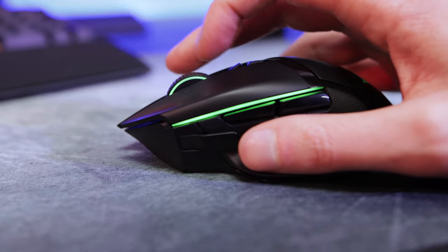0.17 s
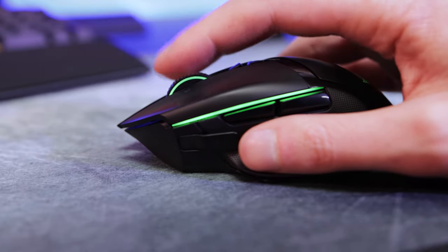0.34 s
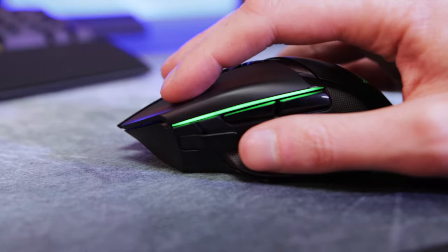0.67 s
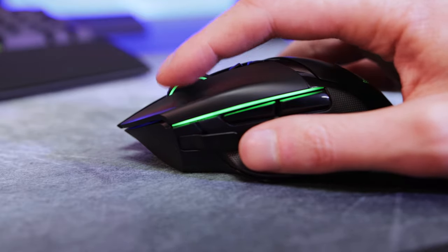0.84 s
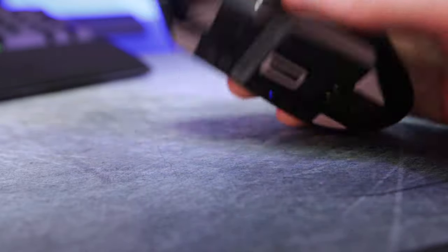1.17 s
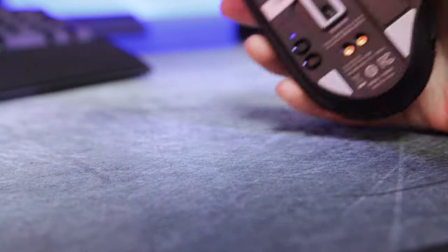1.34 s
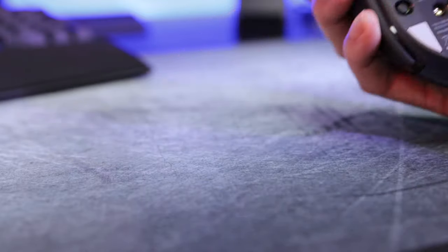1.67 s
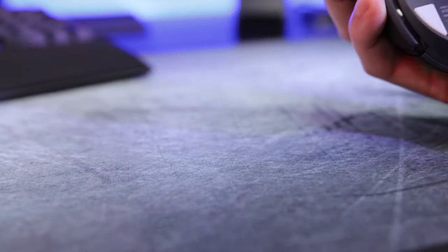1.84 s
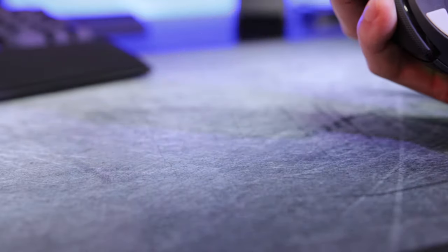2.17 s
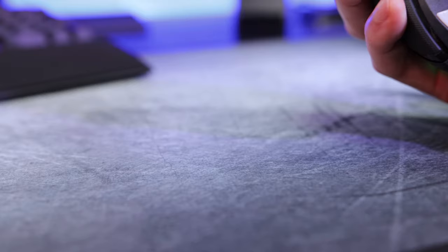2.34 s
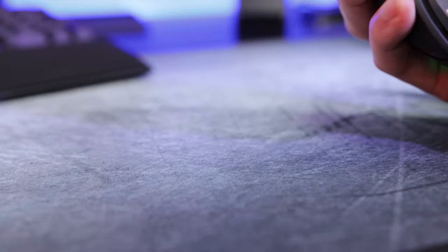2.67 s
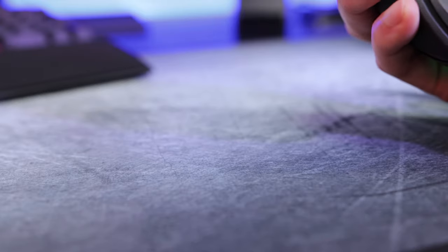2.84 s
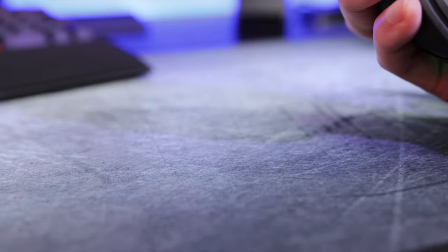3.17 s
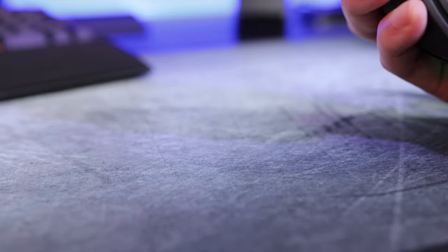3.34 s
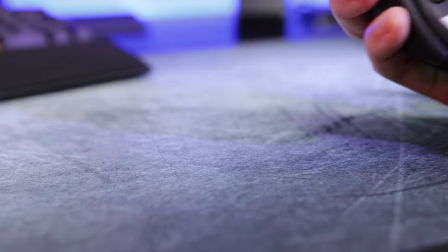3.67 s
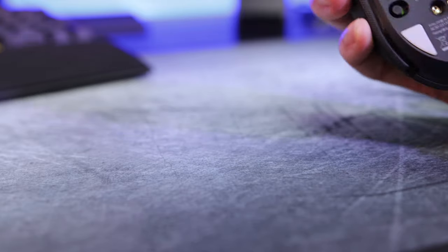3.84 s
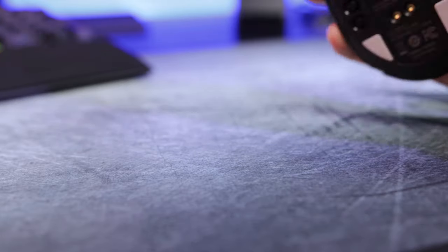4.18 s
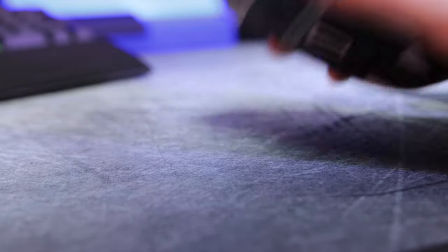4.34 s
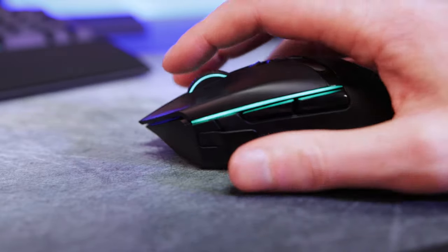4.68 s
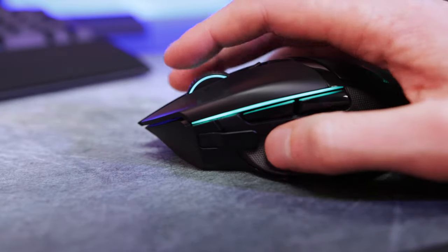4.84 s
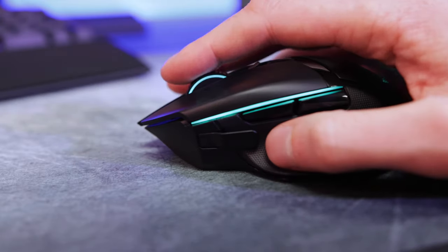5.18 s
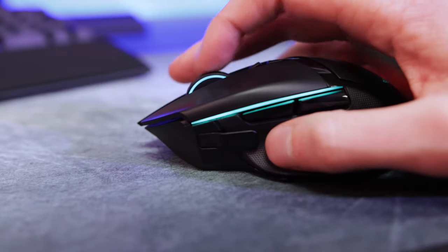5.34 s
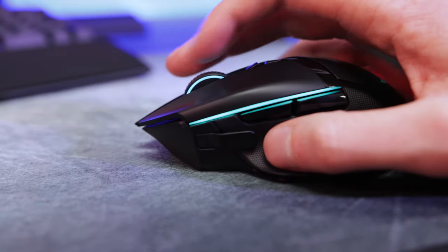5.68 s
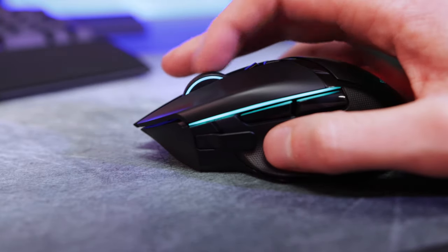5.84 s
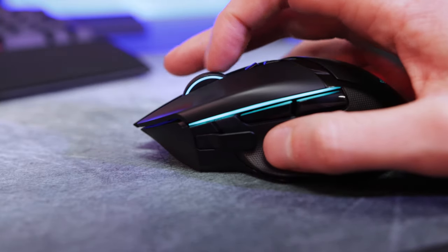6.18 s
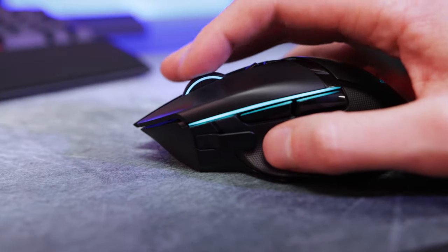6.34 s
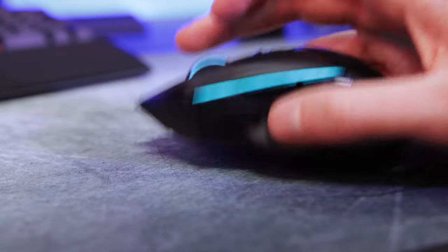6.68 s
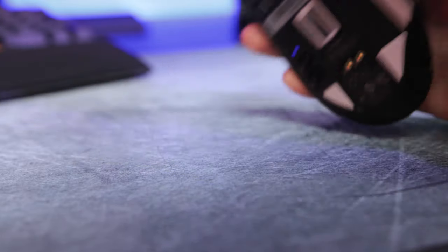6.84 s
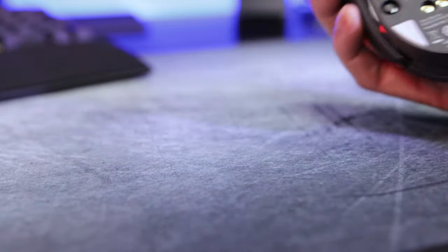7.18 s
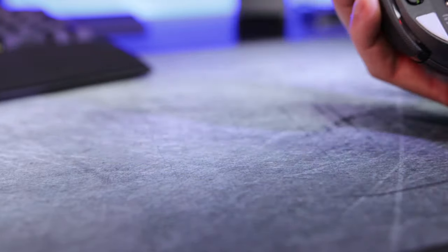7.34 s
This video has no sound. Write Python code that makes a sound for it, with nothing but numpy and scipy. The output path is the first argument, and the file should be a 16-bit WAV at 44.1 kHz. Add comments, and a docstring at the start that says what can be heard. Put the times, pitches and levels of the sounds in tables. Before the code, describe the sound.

Computer fans hum softly in a small room. Close to the microphone, a mouse button clicks twice, sharply. The mouse is lifted off its cloth mat with a rustle, and fingers rub and knock on the hollow plastic shell between scattered clicks. It lands on the desk with two loud clacks, each with a low thud and brief rattle. After a pause it is lifted again with more rubbing, a few taps and a last click.

```python
"""Computer fans hum softly, then a mouse clicks, close to the microphone in a small room.
Each switch chatters for about 2 ms and excites the damped modes of its plastic button. The mouse is
lifted off a cloth mat and handled: fingers knock on the hollow shell and rub it, brighter as they slide
faster. It lands on the desk in two steps, each a blow, a fading rattle and a brief rocking, and is
then lifted and clicked again."""
import sys
import numpy as np
from scipy import signal
from scipy.fft import rfft, irfft, next_fast_len
from scipy.io import wavfile
from scipy.ndimage import uniform_filter1d

SR = 44100
rng = np.random.default_rng(int(sys.argv[2]) if len(sys.argv) > 2 else 0)


def to_wav(sig):
    """Store sig (one row per channel, or 1-D mono) as 16-bit WAV at the path in sys.argv[1].

    Samples outside -1..1 are clipped; the rate is SR.
    """
    pcm = np.clip(np.atleast_2d(sig), -1, 1) * 32767
    pcm = np.round(pcm).astype(np.int16)
    wavfile.write(sys.argv[1], SR, pcm.T)  # frames by channels


N = 331191
TIME = np.arange(N) / SR
BAND_LIMIT_HZ = 16550


def amp(db):
    """Amplitude ratio of a level in decibels."""
    return 10 ** (np.asarray(db) / 20)


def unit_rms(x):
    """Normalisation to unit mean power."""
    return x / np.sqrt(np.mean(x ** 2) + 1e-30)


def curve_at(points, hz):
    """Linear interpolation on a log-frequency axis."""
    f, value = np.transpose(points)
    return np.interp(np.log(hz + 1), np.log(f + 1), value)


def add(mix, s, sound):
    """Superposition: a sound joins the mix at time s."""
    part = mix[round(s * SR):][:len(sound)]
    part += sound[:len(part)]


def hiss(spectrum):
    """Spectral shaping: white noise takes on a given power density."""
    size = next_fast_len(N)
    gain = amp(curve_at(spectrum, np.fft.rfftfreq(size, 1 / SR)))
    return irfft(rfft(rng.standard_normal(size)) * gain, size)[:N] * np.sqrt(SR / 2)


# reverberation time (frequency [Hz], T60 [s])
REVERB_T60 = [(100, 0.0037), (1000, 0.56), (3500, 0.2586), (8000, 0.45), (16000, 0.34)]
# reverberant against direct sound (frequency [Hz], level [dB])
REVERB_LEVEL = [(100, -2), (1000, -18), (2400, -13.5), (3250, -13), (3850, -6.5), (4800, -11.5),
                (7000, -16), (11000, -19), (16000, -24)]
def room(x, build_up_s=0.0078):
    """Diffuse reflections decay exponentially; the mouse moves, so each blow meets its own pattern."""
    t = np.arange(SR // 2) / SR
    reflections = rng.standard_normal(len(t)) * (1 - np.exp(-(t / build_up_s) ** 2))
    hz, when, bands = signal.stft(reflections, SR, nperseg=256)
    t60 = curve_at(REVERB_T60, hz)[:, None]
    gain = amp(curve_at(REVERB_LEVEL, hz))[:, None] * np.sqrt(2 * np.log(1000) / (t60 * SR))
    decay = np.exp(-np.log(1000) * when / t60)
    response = signal.istft(bands * gain * decay, SR, nperseg=256)[1]
    response[0] += 1  # the direct path
    return signal.fftconvolve(x, response)


# rush of air (frequency [Hz], density [dB/Hz])
AIR_SPECTRUM = [(20, -99), (50, -79), (150, -82), (210, -76), (300, -81.5), (500, -83), (750, -87.5),
                (1000, -86), (1180, -85.5), (1500, -91), (2100, -96), (2700, -103), (3400, -103),
                (3850, -100.5), (4300, -106), (4850, -114), (8000, -118), (15700, -119), (16100, -140)]
# fan and mains tones (centre frequency [Hz], typical rms level [dB], waver [Hz])
HUM_TONES = [(86.5, -57.5, 1.574), (120.4, -56, 1.937), (236.75, -61.5, 3.042)]
def fans():
    """Broadband flow noise lies under low tones that waver in pitch and level."""
    out = hiss(AIR_SPECTRUM)
    knots = np.linspace(0, N / SR, num=90)
    for hz, db, waver_hz in HUM_TONES:
        drift, swell = (np.interp(TIME, knots, rng.standard_normal(len(knots))) for _ in range(2))
        phase = 2 * np.pi * np.cumsum(hz + waver_hz * drift) / SR
        out += np.sqrt(2) * amp(db + 1.48 * waver_hz * swell) * np.sin(phase)
    return out


def swells(strokes):
    """Amplitude envelope of short strokes, each a Gaussian pulse."""
    return sum(amp(db) * np.exp(-((TIME - s) / width) ** 2 / 2) for s, width, db in strokes)


def move(points, fade_db_per_s=201.5):
    """Amplitude envelope of a longer move of the hand, with exponential tails at both ends."""
    s, db = np.transpose(points)
    outside_s = abs(TIME - np.clip(TIME, s[0], s[-1]))
    return amp(np.interp(TIME, s, db) - fade_db_per_s * outside_s)


# skin on plastic, before gain and tilt (frequency [Hz], density [dB/Hz])
SKIN_SPECTRUM = [(300, -115), (1100, -93), (2200, -99), (3900, -91), (4900, -103), (6200, -102),
                 (7400, -99), (9500, -104), (13500, -105), (15500, -109)]
def slide(friction, tilt_db_per_octave, body_hz=2500, pivot_hz=8000, slowest_db=-14, brightening=0.35):
    """Sliding friction: faster motion makes the noise louder and tilts its treble upward."""
    hz, when, bands = signal.stft(hiss(SKIN_SPECTRUM), SR, nperseg=256)
    friction_db = np.maximum(20 * np.log10(np.interp(when, TIME, friction) + 1e-9), slowest_db)
    octaves = np.log2(np.maximum(hz, body_hz) / pivot_hz)[:, None]
    tilt = amp((tilt_db_per_octave + brightening * friction_db) * octaves)
    return friction * signal.istft(bands * tilt, SR, nperseg=256)[1][:N]


# friction as the hand lifts the mouse, turns it back over and lifts it again (time [s], level [dB])
LIFT_FRICTION = [(0.92, -23), (1.14, -12), (1.285, -0.18), (1.355, -6.5), (1.475, 6.5), (1.525, -6),
                 (1.575, 6), (1.68, -26)]
TURN_FRICTION = [(3.91, -23.5), (3.955, -2.9), (4.0, 7.5), (4.045, -2.02), (4.07, -2), (4.095, -3),
                 (4.155, 3.5), (4.2, -15.5)]
RELIFT_FRICTION = [(6.58, -17.5), (6.81, -8), (6.85, -1), (6.98, -3.5), (7.01, 4), (7.085, 7), (7.14, -6.5)]
# finger strokes; drags of mat or fingers on the shell (time [s], half length [s], level [dB])
FINGER_STROKES = [(.47, 0.029, -15), (1.853, 0.018, -12), (2.217, .044, -14.5), (2.511, 0.0165, -1.5),
                  (2.652, 0.022, -4), (3.0, 0.025, -17.5), (4.543, .021, -2.5), (4.672, 0.024, 2.5),
                  (7.217, 0.031, -2.5), (7.343, 0.0253, -2.5), (7.471, 0.045, -7)]
SHELL_DRAGS = [(1.26, 0.051, 2.5), (1.52, 0.071, -16), (2.51, 0.024, -2.5), (3.967, 0.048, -3.5),
               (6.87, 0.156, -3.5)]
# resonances of scuffed buttons and dragged shell, at unit gain (frequency [Hz], density [dB/Hz])
SCUFF_SPECTRUM = [(1000, -104), (2300, -94.5), (2700, -87.5), (3000, -95.5), (3470, -87.5), (3900, -95),
                  (4340, -97.5), (5200, -105), (6300, -106), (7050, -100), (8500, -111), (15500, -114)]
DRAG_SPECTRUM = [(500, -100), (900, -96.5), (1200, -81), (1500, -92), (2300, -95.5), (3100, -103),
                 (3850, -91), (4400, -104), (5000, -115)]
def rubbing(fidget_db=-15.5, wander_db=4.5, grain_db=2, catch_db=1.28):
    """Stick-slip friction: skin slips in fine grains, catches now and then, and excites the plastic."""
    knots = np.arange(0, N / SR, 0.07)
    wander = np.interp(TIME, knots, rng.standard_normal(N)[:len(knots)])
    # the fingers never quite rest while they hold the mouse up
    fidget = move([(2.195, fidget_db), (3.88, fidget_db)]) * amp(wander_db * wander)
    fingers = np.hypot(swells(FINGER_STROKES), fidget)
    skin = slide(move(LIFT_FRICTION) + move(RELIFT_FRICTION), tilt_db_per_octave=0.17)
    skin += slide(move(TURN_FRICTION), tilt_db_per_octave=2.5)
    skin += slide(fingers, tilt_db_per_octave=1.5)
    plastic = fingers * hiss(SCUFF_SPECTRUM) + swells(SHELL_DRAGS) * hiss(DRAG_SPECTRUM)
    grains = unit_rms(uniform_filter1d(rng.standard_normal(N), size=70))
    catches = unit_rms(uniform_filter1d(rng.standard_normal(N), size=700))
    return (skin + plastic) * amp(grain_db * grains + catch_db * catches)


def treble_share(hz):
    """High shelf: the share of the treble gain rises from 0 to 1 around 7.5 kHz."""
    return 1 / (1 + (7500 / (hz + 1)) ** 4)


def crack(spectrum, treble_db, contact_s, fade_s, tail_db, damping_hz=9000, size=4096):
    """Modal overlap: dense modes merge into a noise burst during contact, then a duller, dying tail."""
    t, hz = np.arange(size) / SR, np.fft.rfftfreq(size, 1 / SR)
    onset = 1 - np.exp(-(t / 0.000241) ** 2)
    contact = onset * np.exp(-(t / contact_s) ** 4)
    decay = onset * amp(tail_db) * np.exp(-t / fade_s)
    burst = rfft(rng.standard_normal(size) * contact)
    # a hard contact spreads its energy evenly over the broad bands
    band_rms = np.sqrt(abs(uniform_filter1d(abs(burst) ** 2, size=140)))
    burst *= np.linalg.norm(contact) / (band_rms + 1e-12)
    tail = rfft(rng.standard_normal(size) * decay) / np.sqrt(1 + (hz / damping_hz) ** 2)
    colour = unit_rms(amp(curve_at(spectrum, hz))) * amp(treble_db * treble_share(hz))
    return irfft((burst + tail) * colour)[:size // 2]


def ring(modes, contact_s, pitch=1, treble_db=0, size=12000):
    """Damped resonance: modes swell under a half-sine contact force, then decay freely."""
    t, sound = np.arange(size) / SR, np.zeros(size)
    force = np.sin(np.pi * np.minimum(t[:size // 10] / contact_s, 1)) + 1e-9
    force = np.pad(force, (0, size - len(force)))
    for hz, db, t60 in modes:
        if hz * pitch < BAND_LIMIT_HZ:
            pole = np.exp(-np.log(1000) / (t60 * SR))
            swell = signal.lfilter([1], [1, -pole], force)
            gain = amp(db + treble_db * treble_share(hz))
            sound += gain * swell / swell.max() * np.sin(2 * np.pi * hz * pitch * t)
    return sound


def is_lifted(s):
    """Whether the mouse is off the mat at time s."""
    return 1.1 < s < 4.4 or s > 6.7


def strikes(blows, modes, spectrum, contact_s, fade_s, tail_db, beam_db=-5, palm_db=-4):
    """Impact excitation by blows (time [s], ring [dB], crack [dB], treble [dB], pitch [ratio])."""
    out = np.zeros(N)
    for s, ring_db, crack_db, treble_db, pitch in blows:
        tone = amp(ring_db) * ring(modes, contact_s, pitch, treble_db)
        # less of the ring reaches the walls: high modes beam forward, the palm shields a lifted mouse
        spread = amp(ring_db + palm_db * is_lifted(s)) * ring(modes, contact_s, pitch, treble_db + beam_db)
        add(out, s, tone - spread)
        add(spread, 0, amp(crack_db) * crack(spectrum, treble_db, contact_s, fade_s, tail_db))
        add(out, s, room(spread))
    return out


# fingers knock on the shell (time [s], ring level [dB], hardness [0 = pad, 1 = nail])
FINGER_KNOCKS = [(2.5, -46.5, 0.9), (2.8526, -35, 0.804), (3.3346, -39.5, 0.647), (3.6222, -33, 0.912),
                 (3.9850, -39, 0.55), (4.1529, -28, 0.079), (4.3180, -47.5, 0.0497), (7.0090, -39, 0.046),
                 (7.0213, -30.5, 0.032), (7.4545, -37, 1)]
# seams tick under the grip (time [s], crack level [dB])
SEAM_TICKS = [(3.4237, -46), (3.9495, -45.5), (4.347, -50.5), (4.8108, -48), (6.7195, -56), (7.312, -47)]
# modes of the hollow shell (frequency before tuning [Hz], level [dB], T60 [s])
SHELL_MODES = [(995, -18.5, 0.023), (1084.3, 1, 0.0274), (2237, -11.5, 0.0218), (2633, -23.5, 0.0214),
               (3620, -11, 0.0276), (4590, -31, 0.029)]
# its crack (frequency [Hz], level [dB])
SHELL_SPECTRUM = [(200, -9.5), (1000, -15.5), (1600, 0.5), (2500, 7.5), (4500, 3.5), (5400, -4), (6800, -9),
                  (9500, -16.5), (15500, -30.5)]
def shell():
    """Contact hardness sets timbre: pads knock hollowly, nails crack brightly, seams tick faintly."""
    pad, nail = np.array([[-15, -18, 1.0324], [-1.5, 14, 0.91]])  # crack [dB], treble [dB], pitch [ratio]
    tick_ring_db, tick_treble_db, tick_pitch = 0.5, -6, 0.87
    blows = [(s, db + tick_ring_db, db, tick_treble_db, tick_pitch) for s, db in SEAM_TICKS]
    for s, db, hardness in FINGER_KNOCKS:
        crack_db, treble_db, pitch = pad + hardness * (nail - pad)
        blows.append((s, db, db + crack_db, treble_db, pitch))
    return strikes(blows, SHELL_MODES, SHELL_SPECTRUM, contact_s=0.00222, fade_s=0.00473, tail_db=-0.5)


# modes of the desk top (frequency [Hz], level [dB], T60 [s])
DESK_MODES = [(57.6, -16.5, 0.155), (82.25, -1.5, 0.32), (106.1, 3, 0.0914), (143.1, 1, 0.099),
              (187, -5, 0.091), (248, -4, 0.0586), (342.6, -1.5, 0.0462), (461, -9, 0.028)]
def desk(thuds, low_cut_hz=80):
    """Plate vibration: the desk booms under thuds (time [s], level [dB]), with little deep bass."""
    low_cut = signal.butter(2, low_cut_hz, "highpass", fs=SR, output="sos")
    boom = -signal.sosfilt(low_cut, ring(DESK_MODES, contact_s=0.00265, size=20000))  # pushed downward
    out = np.zeros(N)
    for s, db in thuds:
        add(out, s, room(amp(db) * boom))
    return out


# the mouse lands (time [s], ring [dB], crack [dB], treble [dB], pitch [ratio], first touch [dB],
# thud of the first touch [dB], main thud [dB], rocking period [s])
LANDING_STEPS = [(4.4586, -15.5, -18, 1, 1.014, -31, -19.5, -28, .0365),
                 (4.6770, -35.5, -18.5, -7, .96, -33.5, -47, -26.5, .0175)]
# modes of the chassis (frequency before tuning [Hz], level [dB], T60 [s])
CHASSIS_MODES = [(526, -17, 0.044), (954.2, -1.5, 0.063), (1063.6, -5.5, 0.055), (1346, -25.5, 0.038),
                 (1598, -10.5, 0.038), (1842, -3, 0.0247), (2225, -1, 0.0278), (2435, -20.5, 0.024),
                 (2517, -13, 0.021), (3078, 0, 0.0311), (3315, -6, 0.0154), (3704, -9, 0.0296),
                 (4280, -14, 0.023), (5180, -14, .018), (6310, -21, 0.019), (10764, -15.5, .011)]
# its crack (frequency [Hz], level [dB])
CHASSIS_SPECTRUM = [(100, 10.5), (350, 5), (680, -13.5), (1050, 6), (1550, -1), (2100, -10.5), (3300, -0.5),
                    (4800, -9.5), (7500, -7.5), (9300, -15.5), (11200, -11), (16000, -10.5)]
def landing(bounces=3):
    """Inelastic impact: one foot touches, the rest strike, the mouse rattles and rocks ever more weakly."""
    lead_s, touch_crack_db, touch_treble_db = 0.0049, -13.5, 3.5
    fall_db, dull_db, delay_ratio, pitch_ratio = -4.5, -9, 3.6, 0.99  # from bounce to bounce
    rattle_ring_db, first_rock_db, rock_fall_db = -11, -4.5, -9
    blows, thuds = [], [(4.817, -40)]  # this thud is the palm coming to rest on the mouse
    for s, ring_db, crack_db, treble_db, pitch, touch_db, touch_thud_db, thud_db, rock_s in LANDING_STEPS:
        blows.append((s - lead_s, touch_db, touch_db + touch_crack_db, touch_treble_db, 1))
        blows.append((s, ring_db, crack_db, treble_db, pitch))
        for k in range(1, bounces + 1):
            bounce_s = s + rock_s / delay_ratio ** (bounces - k)
            db = crack_db + k * fall_db
            blows.append((bounce_s, db + rattle_ring_db, db, treble_db + k * dull_db, pitch_ratio ** k))
        thuds += [(s - lead_s, touch_thud_db), (s, thud_db)]
        thuds += [(s + (k + 1) * rock_s, thud_db + first_rock_db + k * rock_fall_db) for k in range(2)]
    clack = strikes(blows, CHASSIS_MODES, CHASSIS_SPECTRUM, contact_s=0.00206, fade_s=0.00957, tail_db=-3)
    return clack + desk(thuds)


def snaps(rows, crack_db, pitch, held_db=4.5):
    """Proportional excitation: a switch's crack follows its ring, and is stronger in a lifted mouse."""
    return [(s, db, db + crack_db + held_db * is_lifted(s), treble_db, pitch) for s, db, treble_db in rows]


# side switches go down and spring back (time [s], ring level [dB], treble [dB])
SIDE_DOWNS = [(1.5887, -30.5, 2), (3.7452, -33, 5.5)]
SIDE_UPS = [(1.7098, -29.5, -0.5), (3.9961, -35, 10.5)]
# their modes in each direction (frequency before tuning [Hz], level [dB], T60 [s])
SIDE_DOWN_MODES = [(1020, -9, 0.0148), (2993, -19, 0.03), (7544, -9.5, 0.022), (9870, -8.5, 0.0053),
                   (12446, 0, 0.0043), (13550, -3, 0.0078)]
SIDE_UP_MODES = [(1001, -16, 0.0193), (3040, -46, .008), (7155, -9, 0.0093), (9430, -10.5, 0.0095),
                 (12430, -6.5, 0.0042), (15000, -0.5, 0.0039), (15410, 1, .003)]
# their crack (frequency [Hz], level [dB])
SIDE_SPECTRUM = [(200, -6.5), (1000, -14), (2000, -9.5), (3500, 5.5), (5500, -2.5), (7200, 1.5), (10000, 2),
                 (12400, 8), (15300, 9.5), (16500, -7.5)]
def side_switches(pitch=0.9944):
    """Snap action in small switches: press and release each excite their own high, short-lived modes."""
    down = snaps(SIDE_DOWNS, crack_db=-6, pitch=pitch)
    up = snaps(SIDE_UPS, crack_db=-5.5, pitch=pitch)
    return (strikes(down, SIDE_DOWN_MODES, SIDE_SPECTRUM, contact_s=0.00127, fade_s=0.0035, tail_db=-2)
            + strikes(up, SIDE_UP_MODES, SIDE_SPECTRUM, contact_s=0.00181, fade_s=0.0047, tail_db=-4.5))


# main buttons go down and spring back (time [s], ring level [dB], treble [dB])
BUTTON_DOWNS = [(.5333, -24.5, 11), (.6877, -22.5, 10.5), (2.7714, -20, -2), (3.3548, -21, 1),
                (7.5000, -24, -0.5)]
BUTTON_UPS = [(.5628, -18, -3), (.7398, -19.5, 0.5), (3.1773, -19, -6), (3.6619, -19, -7)]
# modes of a button (frequency before tuning [Hz], level [dB], T60 [s])
BUTTON_MODES = [(1259, -26, 0.0286), (1953, -24.5, 0.024), (2306, -31.5, 0.055), (3218, -19, 0.005),
                (3551, -1, 0.0084), (3735, -15, 0.028), (3939, -13, 0.0156), (5640, -19, 0.0066),
                (6400, -24.5, 0.005), (7090, -23.5, 0.0056), (11150, -17, 0.00226), (14200, -34, .005)]
# its crack (frequency [Hz], level [dB])
BUTTON_SPECTRUM = [(200, -18), (1000, -12.5), (2500, -2.5), (3600, 9.5), (4700, 1.5), (6000, 1),
                   (8200, -3.5), (9800, -8.5), (11000, -5.5), (12500, -5), (14500, -5.5), (16500, -20)]
def main_buttons(pitch=0.9689):
    """Snap action: the switch chatters for about 2 ms and sets its plastic button ringing."""
    down = snaps(BUTTON_DOWNS, crack_db=-13.5, pitch=pitch)
    up = snaps(BUTTON_UPS, crack_db=-18, pitch=pitch)
    return strikes(down + up, BUTTON_MODES, BUTTON_SPECTRUM, contact_s=0.001824, fade_s=0.0042, tail_db=-2)


def scene():
    """Superposition of all sources at one close microphone."""
    return (main_buttons() + side_switches() + shell() + landing() + rubbing() + fans())[None]


def record(dry):
    """Band limiting: a steep low-pass filter removes the highest treble."""
    low_pass = signal.firwin(511, BAND_LIMIT_HZ, window=("kaiser", 9), fs=SR)
    return signal.oaconvolve(dry, low_pass[None], "same")


dry = scene()
out = record(dry)
to_wav(out)
```